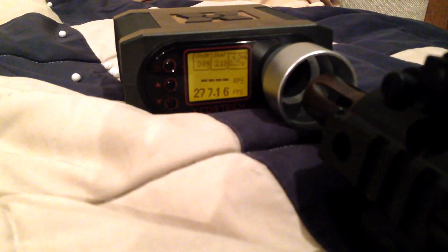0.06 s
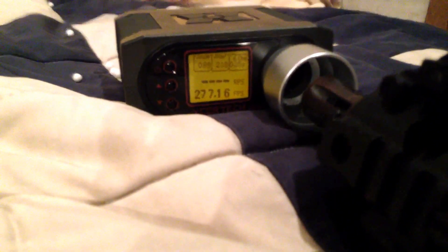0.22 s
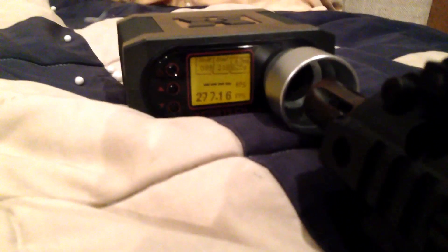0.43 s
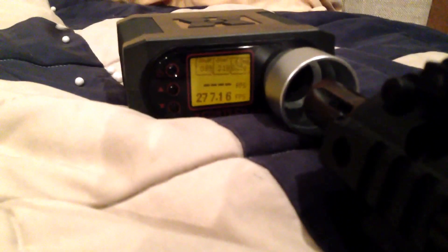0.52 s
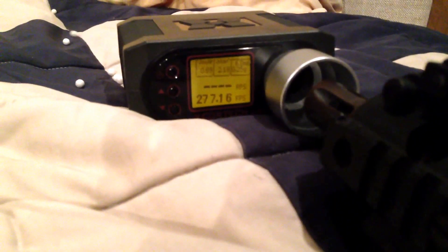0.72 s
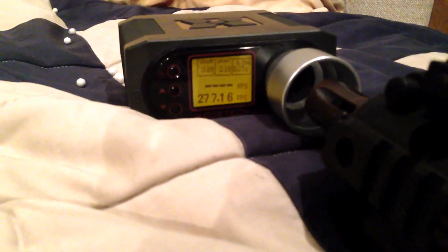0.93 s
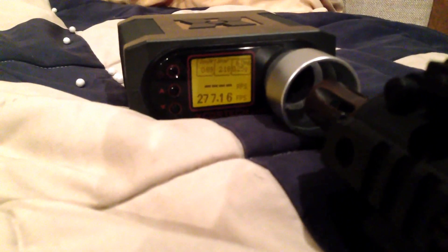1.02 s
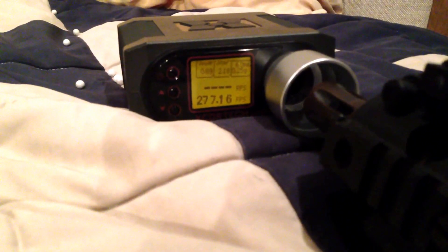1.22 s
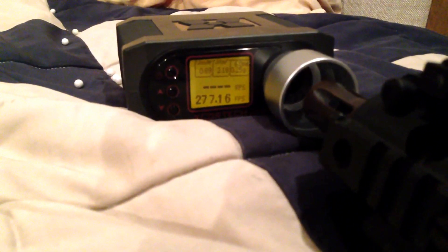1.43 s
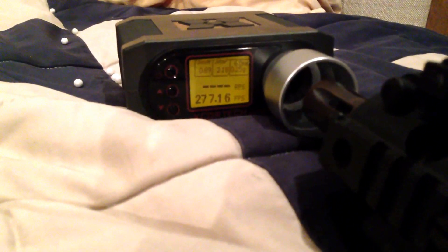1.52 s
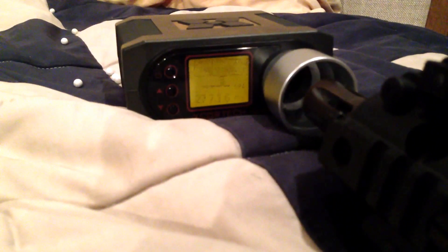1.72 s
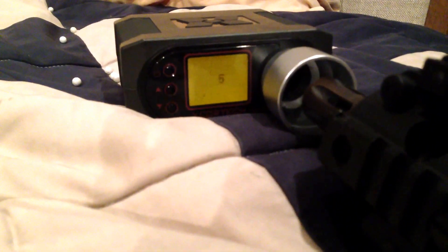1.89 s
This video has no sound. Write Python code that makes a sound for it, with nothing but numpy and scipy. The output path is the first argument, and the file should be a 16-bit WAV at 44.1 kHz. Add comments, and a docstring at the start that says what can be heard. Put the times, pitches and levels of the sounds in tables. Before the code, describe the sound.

An electric airsoft gun fires one very short, rapid burst of hard plastic clacks over a gearbox whirr, close to the microphone in a bedroom; faint clicks, taps and soft bedding thuds follow over quiet hiss.

```python
"""Toy gun burst over a bed

An electric airsoft gun fires one short burst close by: damped sines and shell-filtered noise make
gearbox slams roughly 20 ms apart over a whirr. A tick and tap come just before; more ticks, taps and
soft thuds on the bedding follow, with faint metal ringing. A small room answers in decaying noise.
Automatic gain ducks after the burst and slowly lets the hiss and low rumble return.
"""
import sys
import numpy as np
from scipy import signal
from scipy.fft import rfft, irfft, next_fast_len
from scipy.io import wavfile
from scipy.ndimage import uniform_filter1d, map_coordinates

SR = 44100
rng = np.random.default_rng(int(sys.argv[2]) if len(sys.argv) > 2 else 0)


def log_audio(samples):
    """Write samples as a 16-bit WAV file to the path given in sys.argv[1]."""
    # one column per channel
    frames = np.atleast_2d(samples).T
    # limit to full scale, then quantise
    limited = np.clip(frames, -1, 1)
    pcm = np.round(limited * 32767).astype(np.int16)
    wavfile.write(sys.argv[1], SR, pcm)


def gain_from_db(level_db):
    """Convert decibel levels to linear amplitude factors (20 dB per decade)."""
    decades = np.asarray(level_db, float) / 20
    return 10 ** decades


N = 85995  # length in samples


def along(points, hz):
    """Interpolation of (frequency, value) points on a logarithmic frequency axis."""
    f, v = np.transpose(points)
    return np.interp(np.log(hz + 1), np.log(f + 1), v)


def unit(x):
    """Power normalisation to rms 1."""
    return x / np.sqrt(np.mean(x ** 2) + 1e-20)


def wobble(rate):
    """Band-limited random fluctuation: a smooth curve through rate random knots a second."""
    knots = rng.standard_normal(int(N * rate / SR) + 4)
    return map_coordinates(knots, [np.arange(N) * rate / SR])


def filtered(x, response):
    """Linear filtering by spectral product, scaled so that white noise keeps its level."""
    m = next_fast_len(N + 8192)
    h = response(np.fft.rfftfreq(m, 1 / SR))
    h = h / np.sqrt(np.mean(np.abs(h) ** 2))
    return irfft(rfft(x, m) * h, m)[:N]


def coloured(x, table):
    """Spectral shaping by a curve of relative levels."""
    return filtered(x, lambda f: gain_from_db(along(table, f)))


def resonant(table):
    """Modal superposition: a causal sum of resonances with alternating sign."""
    def response(f):
        return sum((-1) ** k * gain_from_db(db) * 1j * f * width / (hz * hz - f * f + 1j * f * width)
                   for k, (hz, width, db) in enumerate(table))
    return response


def gate(s, db, length, t60, rise=0.00029):
    """Impact envelope: linear rise, hold until length, exponential decay."""
    t = np.arange(N) / SR - s
    return gain_from_db(db - 60 * np.clip(t - length, 0, 1) / t60) * np.clip(t / rise, 0, 1)


def ring(s, db, hz, t60, cycles=0.099):
    """Damped oscillation: a decaying sine whose swell has a time constant in cycles."""
    t = np.clip(np.arange(N) / SR - s, 0, None)
    decay = gain_from_db(db - 60 * np.minimum(t / t60, 2))
    return decay * np.sin(2 * np.pi * hz * t) * (1 - np.exp(-t * hz / cycles))


def spiky(depth_db):
    """Amplitude-modulated noise: uneven small impacts of rms 1."""
    return unit(rng.standard_normal(N) * gain_from_db(depth_db * wobble(1500)))


# gearbox slams; the last three levels are relative to the slam:
# start_s, level_db, rattle_s, push_db, ping_db, treble_db
SLAMS = [(0.2224, -16.5, 0.0074, -12, -12, -0.5), (0.2329, -3, 0.0092, -1.5, -19.5, -7.5),
         (0.245, -2.5, 0.0038, 0, -9, -7), (0.2695, -1.5, 0.0045, -0.5, -11, -6),
         (0.2908, -1.5, 0.0039, 0, -10.5, -5.5), (0.31, -4, 0.0055, -4, -21.5, -6),
         (0.3295, 1, .0065, -0.5, -20.5, -8.5), (0.3497, 2, 0.0027, 0.5, -17, -7),
         (0.374, 3.5, 0.004, -1, -12, -5.5)]
# weaker rebounds between slams: start_s, level_db
REBOUNDS = [(.253, -12.5), (.266, -19.5), (.2805, -12), (.302, -17), (.339, -9.5), (.346, -13), (.355, -8),
            (.3845, -7.5)]
RATTLE_LAG_S = 0.0014  # from the push to the shell's answer


def push():
    """Damped oscillation: each slam and rebound gives a round, short-lived push."""
    hz, t60, gain_db = 1050, 0.007, 2
    slams = sum(ring(s, db + push_db + gain_db, hz, t60) for s, db, _, push_db, *_ in SLAMS)
    return slams + sum(ring(s, db + gain_db, hz, t60) for s, db in REBOUNDS)


# gun shell resonances: centre_hz, width_hz, level_db
SHELL = [(980, 940, -4.5), (1566, 700, -1), (2800, 280, 2), (3417, 230, -1.5)]
# its upper resonances: centre_hz, width_hz, level_db
SHELL_TREBLE = [(5010, 500, -8), (6260, 710, -10), (7280, 800, -11), (10750, 3200, -18),
                (13427, 930, -17.5)]


def rattle():
    """Resonant excitation: bursts of small impacts drive the low and high shell resonances."""
    t60, snap_s = 0.007, 0.0003
    shake = sum(gate(s + RATTLE_LAG_S, db - 5.5, length, t60, snap_s)
                for s, db, length, *_ in SLAMS)
    shake = shake + sum(gate(s, db - 4, 0.0019, t60, snap_s) for s, db in REBOUNDS)
    bright = sum(gate(s + RATTLE_LAG_S, db - 4.5 + treble_db, length, t60, snap_s)
                 for s, db, length, *_, treble_db in SLAMS)
    bright = bright + sum(gate(s, db - 11, 0.0025, t60, snap_s) for s, db in REBOUNDS)
    knocks = spiky(2.5)
    return filtered(shake * knocks, resonant(SHELL)) + filtered(bright * knocks, resonant(SHELL_TREBLE))


def steel_ping():
    """Gaussian tone burst: a thin steel ping ends each slam."""
    hz, lag_s, width_s, gain_db = 14700, 0.0065, 0.0006, -10.5
    t = np.arange(N) / SR
    swell = sum(gain_from_db(db + ping_db + gain_db) * np.exp(-((t - s - lag_s) / width_s) ** 2)
                for s, db, *_, ping_db, _ in SLAMS)
    return swell * np.sin(2 * np.pi * hz * t)


# rise and fall of the whirr: time_s, level_db
WHIRR = [(0.206, -60), (0.218, -46.5), (0.222, -38.5), (.226, -12.5), (0.252, -22.5), (0.261, -36.5),
         (.28, -21.5), (0.376, -20.5), (.388, -35), (.4, -53)]
# spectrum of the gears: frequency_hz, level_db
GEARS = [(88, -39), (150, -0.5), (436, -0.5), (1700, -7.5), (3040, -3.5), (3760, -11), (4840, -8.5),
         (8330, -13), (15500, -29.5)]


def whirr():
    """Modulated broadband noise: the running gears, uneven in level."""
    mesh_rate, mesh_db = 400, 4  # knots a second, depth
    s, db = np.transpose(WHIRR)
    contour_db = np.interp(np.arange(N) / SR, s, db, left=-120, right=-120)
    level = gain_from_db(contour_db + mesh_db * wobble(mesh_rate))
    return level * coloured(rng.standard_normal(N), GEARS)


# shell modes struck by each slam: pitch_hz, level_db, t60_s
CLANG = [(2875, -5, .017), (3140, -12, 0.025), (1247, -7.5, 0.024), (5290, -17, 0.012)]


def clang():
    """Modal excitation: every slam rings the shell modes, each time a little differently."""
    total = np.zeros(N)
    for s, db, _, push_db, *_ in SLAMS:
        for hz, mode_db, t60 in CLANG:
            level_db = db + push_db + mode_db + 2 * rng.standard_normal()
            pitch_hz = hz * (1 + 0.018 * rng.standard_normal())
            total += ring(s + RATTLE_LAG_S, level_db, pitch_hz, t60)
    return total


# low thumps of air and body, then thuds on the bedding: start_s, level_db, pitch_hz, t60_s
THUMPS = [(0.235, -1, 252, 0.042), (0.237, -0.5, 109.5, 0.051), (0.313, -9, 304.4, 0.11),
          (0.311, -1, 560, 0.023), (.374, -6, 612, 0.042), (0.9551, -34.5, 347, 0.016),
          (0.967, -38.5, 267, 0.041), (.977, -44.5, 329.5, 0.025), (.99, -47, 281.6, 0.068),
          (1.119, -44.5, 173.3, 0.072), (1.283, -47, 183, 0.064), (1.333, -46.5, 377.4, 0.031),
          (1.343, -50.5, 352, .03)]


def thumps():
    """Damped low oscillation: air and body thumps in the burst, soft thuds later."""
    return sum(ring(*row, cycles=0.33) for row in THUMPS)


# trigger ticks; ring level is relative to the tick: start_s, level_db, length_s, ring_db
TICKS = [(0.1921, -48, .002, -19.5), (.845, -62, .006, 5), (0.8514, -47, 0.0047, 10),
         (0.888, -45.5, 0.0021, -5), (1.1472, -40.5, 0.0094, -22), (1.377, -57.5, 0.0021, 0),
         (1.45, -58.5, .002, 4), (1.4962, -59, 0.0056, -16)]
# spectrum of the bare tick: frequency_hz, level_db
TICK_COLOUR = [(350, -49.5), (600, -22), (2950, -3.5), (6580, -11.5), (7540, -6.5), (9120, -17.5),
               (10900, -8.5), (15500, -30.5)]
# resonances of the trigger parts: centre_hz, width_hz, level_db
TRIGGER = [(427.1, 170, -17.5), (740, 250, -11.5), (1737, 44, 2.5), (2186, 130, 0), (4600, 240, -8.5),
           (8628, 600, -15)]


def trigger():
    """Impact excitation: bright ticks that ring the trigger parts to differing degrees."""
    t60 = 0.03
    bright = sum(gate(s, db, length, t60) for s, db, length, _ in TICKS)
    rung = sum(gate(s, db + ring_db, length, t60) for s, db, length, ring_db in TICKS)
    ticks = coloured(bright * spiky(1.3), TICK_COLOUR)
    return ticks + filtered(rung * spiky(1.2), resonant(TRIGGER))


# taps; knock level is relative to the tap: start_s, level_db, length_s, knock_db, knock_hz
TAPS = [(0.192, -45, .004, -30.5, 1026), (1.169, -50, 0.0082, -8, 1028), (1.1803, -31.5, 0.0041, -4, 1002),
        (1.189, -47.5, 0.0032, 4.5, 1020), (1.201, -49, 0.0054, -9, 1150),
        (1.435, -42.5, 0.0092, 1.5, 1004), (1.459, -54, 0.0028, -17, 1112), (1.497, -60, 0.008, 9, 1133)]
# resonances of the plastic body: centre_hz, width_hz, level_db
PLASTIC = [(650, 300, -9), (1440, 400, -7), (2006, 190, 1.5), (2552, 150, 8), (2928, 240, 1.5),
           (3600, 810, -6.5), (5013, 270, -1), (7680, 900, -17.5), (10530, 1600, -24)]


def taps():
    """Cavity and shell resonance: duller plastic taps, each with a hollow knock at its own pitch."""
    t60, rise_s, waver_db = 0.04, 0.0025, 3.5
    t = np.arange(N) / SR
    high = sum(gate(s, db, length, t60, rise_s) for s, db, length, *_ in TAPS)
    knock = sum(gate(s, db + knock_db, length, t60, rise_s) * np.sin(2 * np.pi * hz * (t - s))
                for s, db, length, knock_db, hz in TAPS)
    return filtered(high * spiky(2.6), resonant(PLASTIC)) + knock * gain_from_db(waver_db * wobble(200))


# tiny high pings of a loose part: start_s, level_db
PINGS = [(1.331, -50), (1.377, -56)]


def loose_part():
    """Single-mode vibration: a loose part pings with a slow swell."""
    return sum(ring(s, db, hz=5167, t60=0.016, cycles=4.6) for s, db in PINGS)


# metal parts ringing on: pitch_hz, level_db, t60_s
AFTER_RING = [(850, -66, 2.89), (1085.4, -67.5, 4.9)]


def after_ring():
    """Lightly damped modes: metal parts ring long and faintly after the burst."""
    return sum(ring(0.66, db, hz, t60) for hz, db, t60 in AFTER_RING)


# reverberation times: frequency_hz, t60_s
ROOM = [(150, 0.5), (600, 0.42), (1100, 0.53), (2000, .5), (2900, 0.51), (4200, .47), (7000, .33),
        (10000, .22), (15000, 0.165)]


def room(x):
    """Diffuse reverberation: noise whose every frequency decays at its own speed."""
    gap_s, wander_rate, wander_rad = 0.004, 500, 1.8
    hz, t, z = signal.stft(rng.standard_normal(SR), SR, nperseg=256)
    decay = gain_from_db(-60 * t / along(ROOM, hz)[:, None])
    tail = signal.istft(z * decay, SR, nperseg=256)[1]
    # a random phase wander spreads each pitch, so the reverberation is smooth and diffuse
    analytic = signal.hilbert(x, next_fast_len(N))[:N]
    spread = np.real(analytic * np.exp(1j * wander_rad * wobble(wander_rate)))
    delayed = np.pad(spread, (round(gap_s * SR), 0))
    return signal.fftconvolve(delayed, tail / np.linalg.norm(tail))[:N]


# the burst's colour towards the walls: frequency_hz, level_db
ROOM_COLOUR = [(80, -19.5), (250, 2), (550, 1), (1050, -4), (1900, -1.5), (2850, -6.5), (4600, 2.5),
               (8000, 0.5), (13000, 3), (14600, -12.5)]
# the handling sounds' colour towards the walls: frequency_hz, level_db
SMALL_COLOUR = [(300, -0.5), (1040, -4.5), (2700, -0.5), (8000, 2.5)]


def reflections(gun, small):
    """Directional radiation: burst and handling reach the walls with different colours."""
    gun_wet = gain_from_db(-17.5) * coloured(room(gun), ROOM_COLOUR)
    return gun_wet + gain_from_db(-12) * coloured(room(small), SMALL_COLOUR)


# spectrum of the hiss: frequency_hz, level_db
HISS = [(60, -25), (130, -7), (250, -5.5), (500, -9.5), (900, -15), (1600, -14.5), (3800, -10.5),
        (9000, -13.5), (14700, -14.5), (15600, -24)]


def hiss():
    """Stationary random noise: a steady coloured hiss."""
    return gain_from_db(-65.5) * coloured(rng.standard_normal(N), HISS)


def rumble():
    """Narrow-band noise: a low rumble with a lumpy level."""
    band = resonant([(206, 200, 0)])  # centre Hz, width Hz, dB
    low = filtered(rng.standard_normal(N), lambda f: band(f) ** 2)
    return gain_from_db(-72.5 + 1.5 * wobble(38)) * low


def scene():
    """Linear superposition of the sources, the room's answer and the background."""
    gun = push() + rattle() + steel_ping() + whirr() + clang() + thumps()
    small = trigger() + taps() + loose_part()
    return (gun + small + after_ring() + reflections(gun, small) + hiss() + rumble())[None]


def ducking(dry):
    """Automatic gain control: loud sound lowers the gain, which holds and then creeps back."""
    threshold_db, depth_db, hold_s, recover_s = -30, 8, 0.4, 0.55
    loud = np.abs(uniform_filter1d(dry[0] ** 2, size=441)) > gain_from_db(threshold_db) ** 2
    t = np.arange(N) / SR
    since = t - np.maximum.accumulate(np.where(loud, t, -99))
    duck = np.exp(-np.clip(since - hold_s, 0, None) / recover_s)
    # a trailing 0.2 s average: the gain falls gradually
    duck = uniform_filter1d(np.pad(duck, (SR // 10, 0)), size=SR // 5)[:N]
    return gain_from_db(-depth_db * duck)


def microphone_band(f):
    """Band limitation: a second-order low cut and a steep top edge."""
    low_hz, top_hz = 105, 15500
    return (1j * f / (low_hz + 1j * f)) ** 2 / (1 + (f / top_hz) ** 80)


def roll_off(x):
    """The treble ends steeply here."""
    return signal.sosfilt(signal.butter(12, 16320, fs=SR, output="sos"), x)


def record(dry):
    """Transduction chain: gain control, soft saturation of peaks, then band limitation."""
    knee = 5  # higher bends later and harder
    x = dry * ducking(dry)
    x = x / (1 + np.abs(x) ** knee) ** (1 / knee)
    mix = filtered(x[0], microphone_band)[None] * gain_from_db(-3)
    return roll_off(mix)


dry = scene()
out = record(dry)
log_audio(out)
```